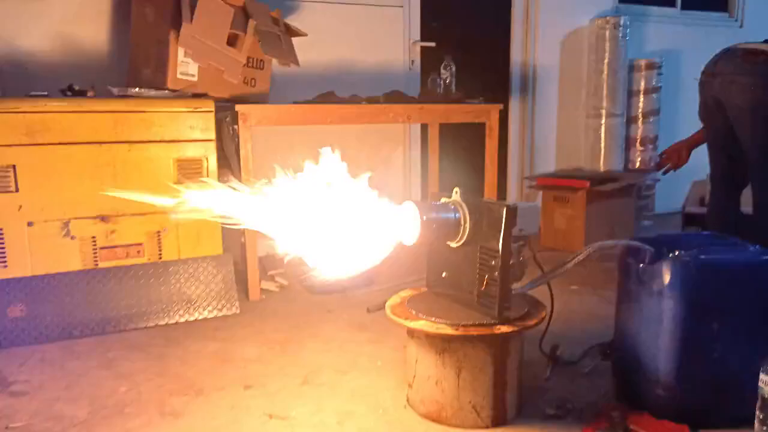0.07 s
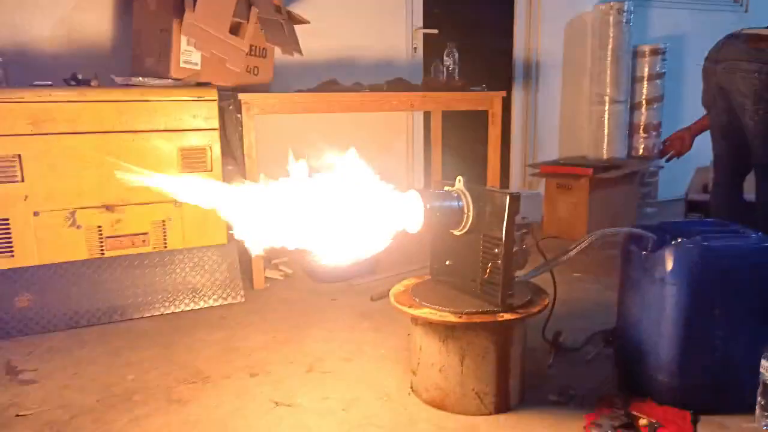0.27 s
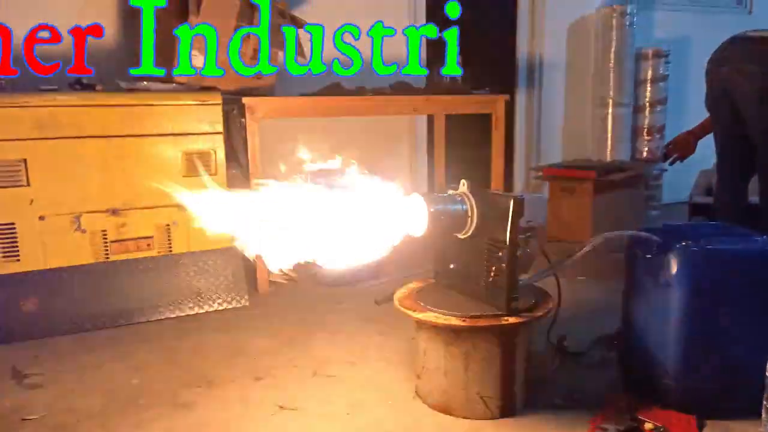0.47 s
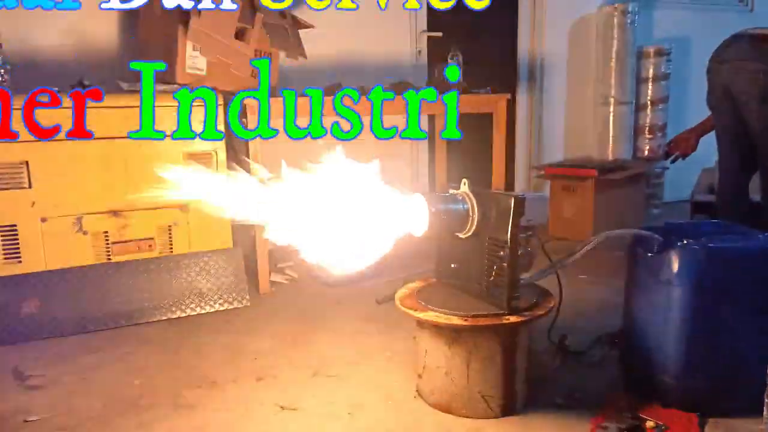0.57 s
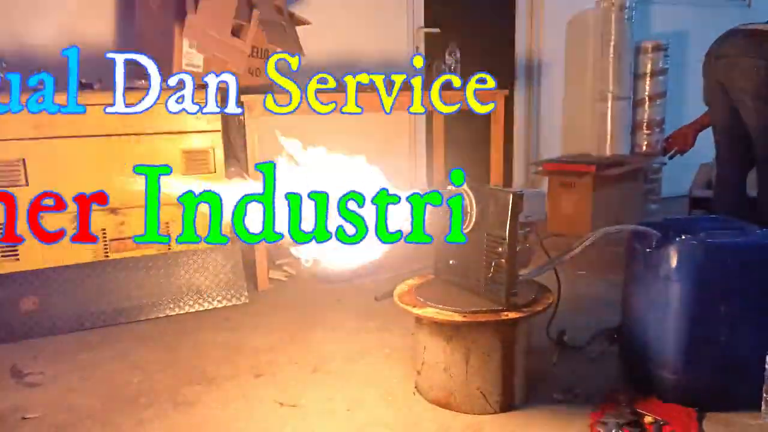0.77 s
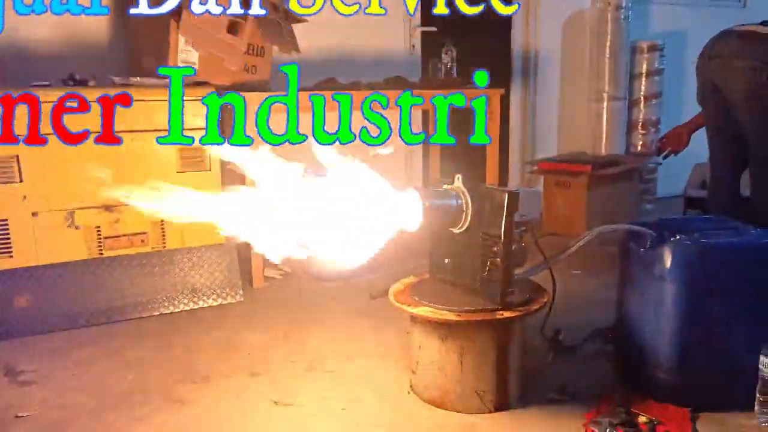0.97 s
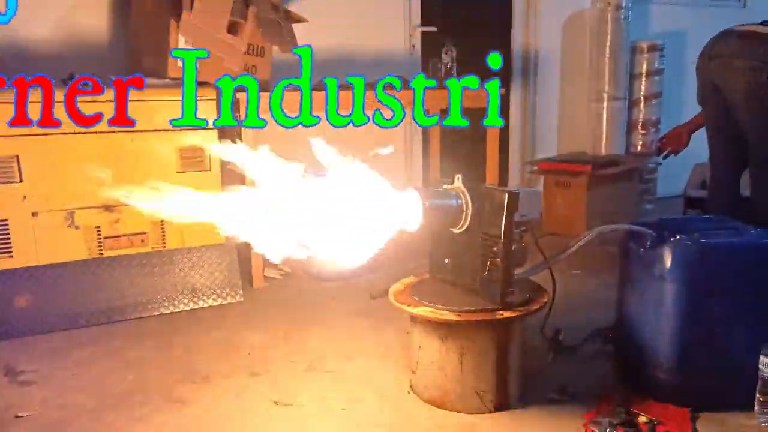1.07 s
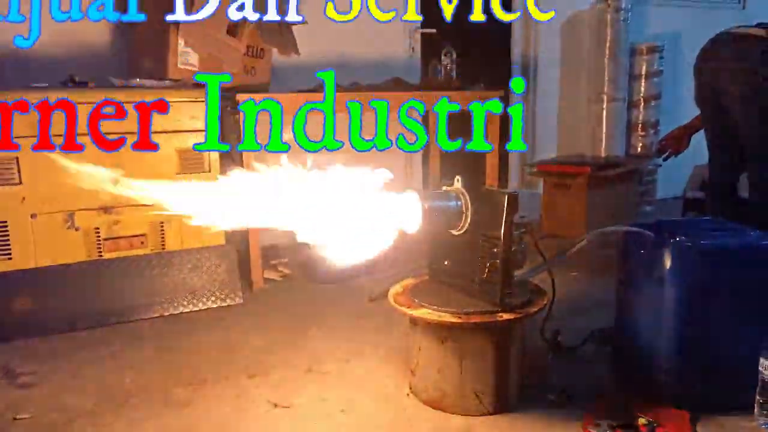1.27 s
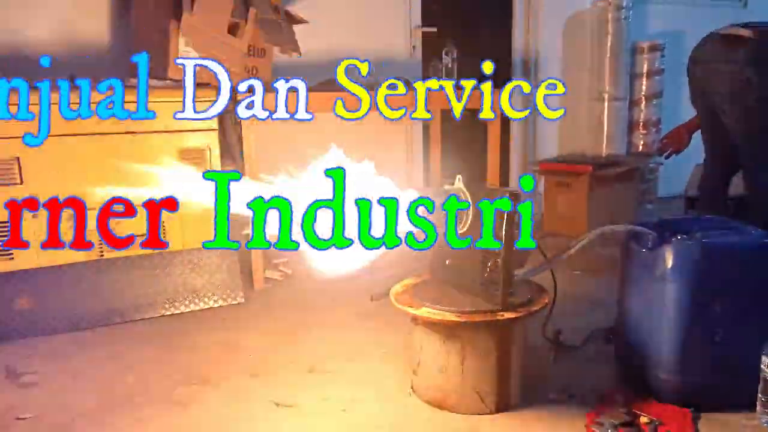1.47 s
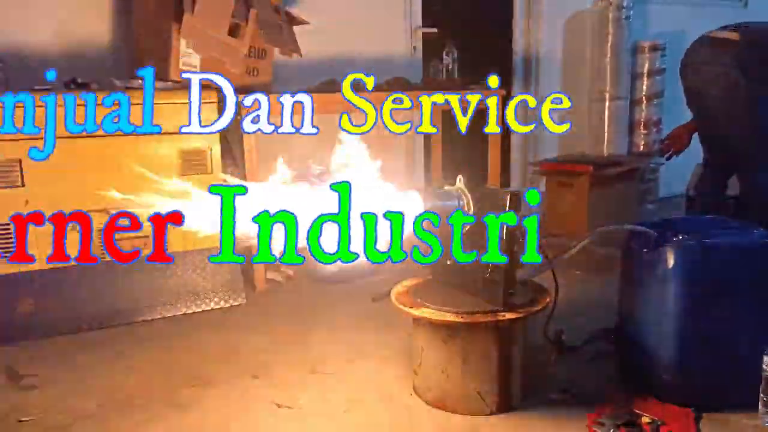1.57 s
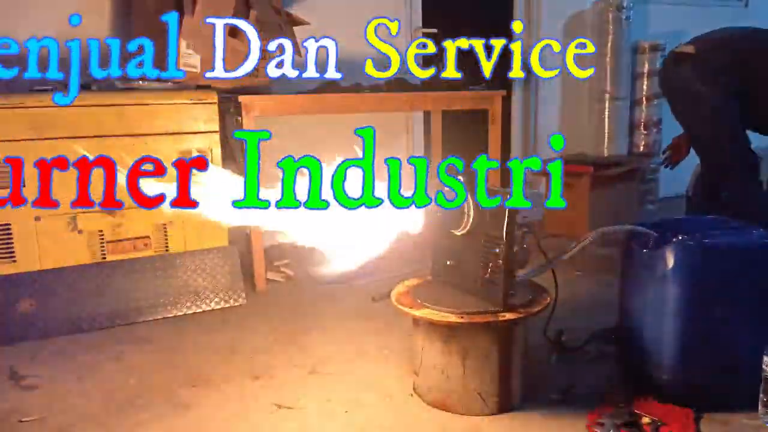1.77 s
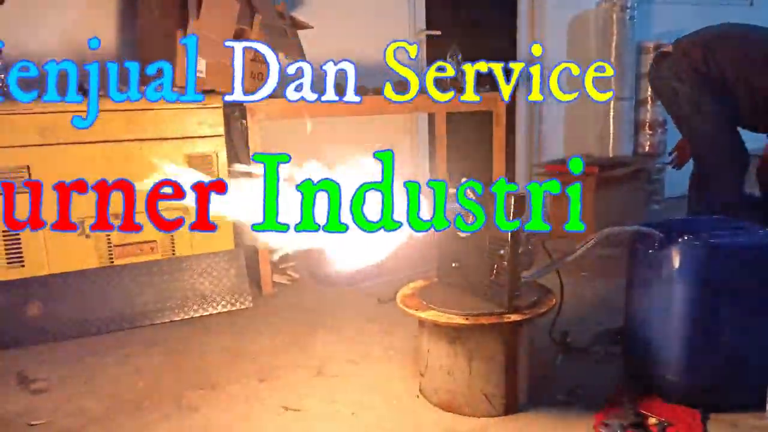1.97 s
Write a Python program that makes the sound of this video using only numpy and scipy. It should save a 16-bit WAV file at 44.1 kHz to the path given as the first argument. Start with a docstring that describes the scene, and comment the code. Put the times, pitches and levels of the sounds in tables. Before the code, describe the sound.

The roar of an oil burner flame rises out of silence in a workshop and keeps going, deep and fluttering, with a wavering drone and brief low puffs. Above it run a steady rush, light hiss and faint fan whine.

```python
"""The turbulent flame of an oil burner rumbles in a workshop, fading in and then burning on.
Unsteady heat release makes the low noise; resonances make it throb and drone, and pockets
of spray burn in harder puffs. Over it lie the rush of burning spray, the hiss of the nozzle
and the thin whine of the combustion fan."""
import sys
import numpy as np
from scipy import signal
from scipy.fft import rfft, irfft
from scipy.io import wavfile
from scipy.ndimage import uniform_filter1d

SR = 44100
rng = np.random.default_rng(int(sys.argv[2]) if len(sys.argv) > 2 else 0)


def transcribe(signal):
    """Save signal, clipped to [-1, 1], as a 16-bit WAV file at the path in sys.argv[1]."""
    frames = np.atleast_2d(signal).T
    limited = np.clip(frames, -1, 1)
    pcm = np.round(limited * 32767).astype(np.int16)
    wavfile.write(sys.argv[1], SR, pcm)


N = 89214
T = np.arange(N) / SR
HZ = np.fft.rfftfreq(N, 1 / SR)


def gain_of(db):
    """Amplitude grows tenfold every 20 dB."""
    return 10 ** (np.asarray(db) / 20)


def unit_rms(x):
    """Normalisation to unit power."""
    return x / np.sqrt(np.mean(x ** 2) + 1e-20)


def per_bin(table):
    """Interpolation over log frequency."""
    hz, value = np.transpose(table)
    return np.interp(np.log(HZ + 1), np.log(hz + 1), value)


def envelope(table, column):
    """Interpolation of decibels over time, as a gain."""
    rows = np.array(table)
    return gain_of(np.interp(T, rows[:, 0], rows[:, column]))


def white_spectrum():
    """White noise has equal mean power per hertz."""
    return rfft(rng.standard_normal(N))


def wander(rate_hz):
    """Low-passed noise gives random motion of rms 1."""
    return unit_rms(irfft(white_spectrum() * (HZ > 0) / (1 + (HZ / rate_hz) ** 4), N))


def steadied(x, share, window_samples):
    """Compression evens out a share of the slow level swings."""
    power = uniform_filter1d((x ** 2).mean(0), window_samples)
    return unit_rms(x / power ** (share / 2))


# Likeness of the channels. Each row: frequency in Hz, correlation from 0 to 1.
COHERENCE = [(60, .9998), (220, 1), (340, 0.87), (600, 0.95), (850, 1), (1050, 0.75), (1200, 0.34),
             (1420, 0.76), (1750, 0.52), (2300, 0.31), (3000, 0.65), (4200, 0.23), (5200, 0), (7000, .25),
             (15000, 0)]
# Stereo balance. Each row: frequency in Hz, left minus right in dB.
BALANCE = [(90, 0.5), (170, 0.4), (240, -.4), (330, -2.8), (510, 4.5), (680, 2), (820, -1), (1100, -6),
           (1280, -4.5), (1500, 1), (1750, -1), (2350, -5), (3600, -5.5), (5000, -1.7), (8000, -0.5),
           (11500, -2.5), (15000, -14)]


def stereo_noise(shape):
    """Partial coherence: noise of rms 1, alike left and right in the bass, less so in the treble."""
    coherence = per_bin(COHERENCE)
    mid = np.sqrt((1 + coherence) / 2) * white_spectrum()
    side = np.sqrt((1 - coherence) / 2) * white_spectrum()
    tilt = gain_of(per_bin(BALANCE) / 2)
    pair = np.array([(mid + side) * tilt, (mid - side) / tilt]) / np.sqrt(tilt ** 2 + tilt ** -2)
    return unit_rms(irfft(pair * shape, N))


def workshop(echoes=40, longest_s=.03, echo_db=-8, stereo_lag_s=.0004):
    """Interference with reflections from floor, walls and furniture ripples the spectrum."""
    delays = rng.uniform(.003, longest_s, echoes)
    lags = stereo_lag_s * rng.uniform(-1, 1, echoes)
    signs = rng.choice([-1., 1.], echoes)
    taps = np.zeros((2, N))
    taps[0, (delays * SR).astype(int)] = signs
    taps[1, ((delays + lags) * SR).astype(int)] = signs
    return 1 + gain_of(echo_db) * rfft(taps) / np.sqrt(echoes)


# Strength of the flame. Each row: time in seconds, rush gain in dB, rumble gain in dB.
FLAME_STRENGTH = [(.34, -26, -26.5), (.6, -25, -24.5), (.7, -23, -26), (.92, -23.4, -25), (1.0, -22, -21.5),
                  (1.06, -22.5, -23.5), (1.25, -21.5, -23), (1.4, -22, -23), (1.55, -21.5, -21),
                  (1.7, -21.5, -24), (1.86, -19, -22.5), (2.02, -21.5, -21.5)]


def flame_gain(part):
    """Common modulation: the layers follow the flame's rush or rumble envelope."""
    return envelope(FLAME_STRENGTH, column={"rush": 1, "rumble": 2}[part])


# Tones of the fan. Each row: frequency in Hz, mean level in dB.
FAN_TONES = [(486, -38), (513, -41), (1514.5, -40), (2439, -49.5), (2992, -54), (3999, -56)]


def fan(waver=.00071, flutter_db=2.5):
    """Periodic blade passage makes tones that waver with the shaft and flutter in the hot air."""
    shaft_time = np.cumsum(1 + waver * wander(4.8)) / SR
    whine = np.zeros((2, N))
    for channel in whine:
        for hz, db in FAN_TONES:
            tone = np.sqrt(2) * np.sin(2 * np.pi * hz * shaft_time)
            channel += gain_of(db + flutter_db * wander(9)) * tone
    return whine * unit_rms(flame_gain("rush"))


# Spectra of the burning spray and the nozzle. Each row: frequency in Hz, relative density in dB.
RUSH_SPECTRUM = [(150, -68), (300, -8.5), (390, -4.5), (490, 0), (580, -1), (670, 1), (830, -0.5),
                 (1080, -4), (1210, -10), (1430, -4.5), (1650, -8), (2150, -8.5), (2380, -7), (2700, -15),
                 (2980, -8), (3300, -13.5), (4050, -14), (4400, -21.5), (5050, -26.5), (7000, -25.5),
                 (16000, -59)]
HISS_SPECTRUM = [(3000, -9), (5100, -19), (6200, -8.5), (6900, -0.5), (7900, -8), (9500, -15.5),
                 (12000, -25.5), (15500, -15.5)]


def rush_and_hiss(rush_db=1, hiss_db=-13):
    """Amplitude modulation: the same turbulence shakes the spray's rush and the nozzle's hiss."""
    room = workshop()
    flicker, swell_db = wander(130), .26 * wander(11.4)
    rush = stereo_noise(gain_of(per_bin(RUSH_SPECTRUM)) * room)
    hiss = stereo_noise(gain_of(per_bin(HISS_SPECTRUM)) * room)
    rush *= gain_of(rush_db + .58 * flicker + swell_db)
    hiss *= gain_of(hiss_db + .74 * flicker + swell_db)
    return flame_gain("rush") * (rush + hiss)


# Harder puffs. Each row: centre in seconds, pitch in Hz, peak level in dB.
FLAME_PUFFS = [(.29, 130, -15), (0.545, 83, -14), (1.119, 88, -11.5), (1.562, 79.95, -14.5),
               (1.866, 131, -13.5)]


def puffs(width_s=.011):
    """Sudden heat release: a pocket of spray burns at once, sending out a short, low pulse."""
    pulses = np.zeros(N)
    for centre, hz, db in FLAME_PUFFS:
        t = T - centre
        pulses -= gain_of(db) * np.exp(-(t / width_s) ** 2) * np.cos(2 * np.pi * hz * t)
    return pulses


# Course of the drone. Each row: time in seconds, pitch in Hz, relative level in dB.
DRONE_PATH = [(.28, 180, -21), (.41, 179.8, -38), (.47, 193.9, -22), (.535, 222.9, -15.5),
              (.585, 224.4, -27), (.63, 216, -17.5), (.68, 209.4, -28.5), (.8, 198, -19), (.88, 200.2, -27),
              (.95, 195.4, -15), (1.069, 189.5, -34.5), (1.151, 171.6, -16), (1.24, 184.2, -15.5),
              (1.32, 200.3, -26), (1.39, 202.6, -14.5), (1.49, 205, -20), (1.56, 200, -23),
              (1.68, 222, -14), (1.77, 222.8, -15), (1.81, 178, -16), (1.87, 174.7, -11.5),
              (1.93, 177.7, -34), (2.02, 195, -35)]


def drone(gain_db=-1, jitter=.03, flutter_db=2.5):
    """Lock-in: the flame hums unsteadily on one resonance, then slides to another."""
    times, hz, _ = np.transpose(DRONE_PATH)
    pitch = np.interp(T, times, hz) * (1 + jitter * wander(37.5))
    hum = np.sqrt(2) * np.sin(2 * np.pi * np.cumsum(pitch) / SR)
    return gain_of(gain_db + flutter_db * wander(45)) * envelope(DRONE_PATH, column=2) * hum


# Low resonances. Each row: centre in Hz, half-width in Hz, relative peak in dB.
RESONANCES = [(176, 9.4, 0.5), (205.4, 32, -3), (224.7, 13.5, 1), (299, 19, -12), (339, 10, -15)]


def throb(gain_db=1.04):
    """Beating: combustion noise rings in close resonances that interfere."""
    shape = sum(gain_of(db) / (1 + ((HZ - hz) / width) ** 2) for hz, width, db in RESONANCES)
    ringing = steadied(stereo_noise(shape), share=.92, window_samples=3500)
    return gain_of(gain_db) * flame_gain("rush") * ringing


# Spectrum of the flame's rumble. Each row: frequency in Hz, relative density in dB.
RUMBLE_SPECTRUM = [(12, -45), (25, -18), (43, -13.5), (68, -3), (92, 0.5), (135, -2.5), (200, -4),
                   (260, -5), (320, -8), (400, -20.5), (700, -47.5)]


def rumble(gain_db=4.5):
    """Turbulent combustion: uneven expansion of the gas radiates low noise."""
    noise = stereo_noise(gain_of(per_bin(RUMBLE_SPECTRUM)))
    return gain_of(gain_db) * flame_gain("rumble") * steadied(noise, share=.85, window_samples=5000)


def scene():
    """Superposition: the burner's sounds add as pressures."""
    return rumble() + throb() + drone() + puffs() + rush_and_hiss() + fan()


def record(dry):
    """Gain and band limiting: a quick step out of silence, a fade-in, then a low-pass filter."""
    start_s, step_s, fade_s, cutoff_hz = .09, .002, .26, 15800
    floor = gain_of(-24)
    step = np.clip((T - start_s) / step_s + .5, 0, 1)
    rise = np.clip((T - start_s) / fade_s, 0, 1) ** 1.27
    fade = step * (floor + (1 - floor) * rise)
    lowpass = signal.firwin(511, cutoff_hz, window=("kaiser", 9), fs=SR)
    return signal.oaconvolve(dry * fade, lowpass[None], "same")


dry = scene()
out = record(dry)
transcribe(out)
```